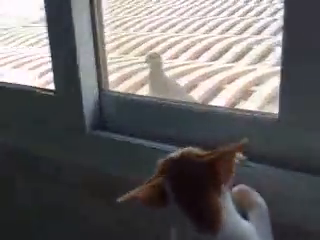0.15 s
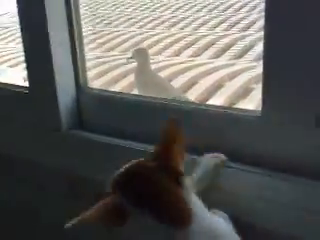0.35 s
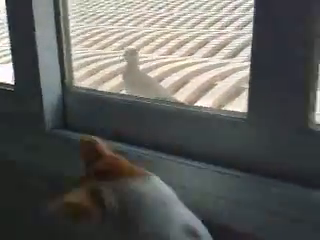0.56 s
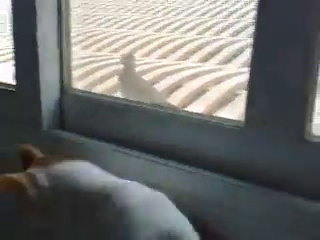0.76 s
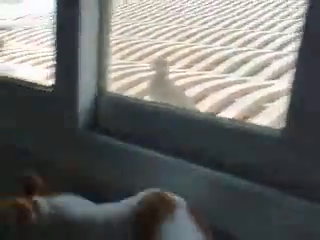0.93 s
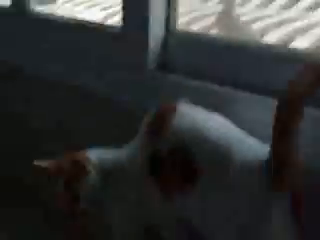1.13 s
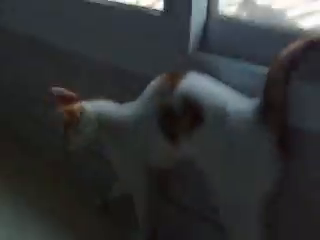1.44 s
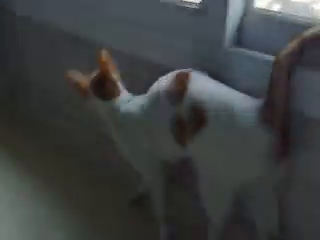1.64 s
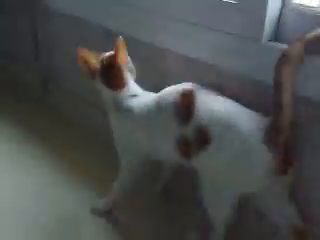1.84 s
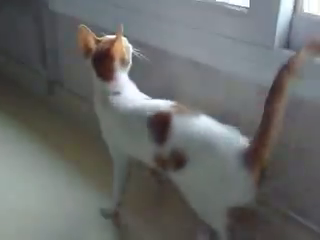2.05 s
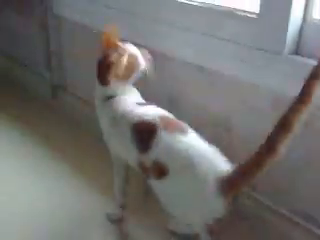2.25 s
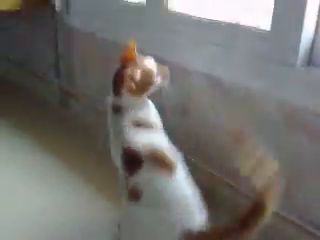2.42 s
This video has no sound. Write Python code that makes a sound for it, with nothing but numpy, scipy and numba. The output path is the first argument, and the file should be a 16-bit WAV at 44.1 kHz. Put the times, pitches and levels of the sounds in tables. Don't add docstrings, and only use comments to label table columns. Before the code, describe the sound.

A cat meows once, short and high, in a bare echoing room over a low motor hum.

```python
import sys
import numpy as np
from scipy import signal
from scipy.io import wavfile
from scipy.ndimage import uniform_filter1d
from numba import njit

SR = 44100
rng = np.random.default_rng(int(sys.argv[2]) if len(sys.argv) > 2 else 0)


def generate_wav(sig):
    pcm = np.round(np.clip(np.atleast_2d(sig).T, -1, 1) * 32767).astype(np.int16)
    wavfile.write(sys.argv[1], SR, pcm)


def gain_from_decibels(decibels):
    exponent = np.asarray(decibels, float) / 20
    return 10 ** exponent


N = 113778


def level(x, db):
    return x * gain_from_decibels(db) / np.sqrt(np.mean(x ** 2))


def colour(table, hz):
    table = np.array(table, float)
    return np.interp(np.log(hz + 1), np.log(table[:, 0]), table[:, 1])


def band(x, hz, width_hz):
    edges_hz = [max(hz - width_hz / 2, 10), hz + width_hz / 2]
    return signal.sosfilt(signal.butter(2, edges_hz, "band", fs=SR, output="sos"), x)


def noise_band(hz, width_hz):
    return band(rng.standard_normal(N), hz, width_hz)


def walk(rate_hz):
    k = int(SR / rate_hz)
    held = np.repeat(rng.standard_normal(N // k + 1), k)
    return 1.96 * uniform_filter1d(uniform_filter1d(held, k), k)[:N]


def turbulence(table, db, low_hz, count, flicker_db):
    out, swell_db = 0, 0.25 * walk(1.5)
    for hz in low_hz * 2 ** (np.arange(count) / 3):
        gain = gain_from_decibels(colour(table, hz) + swell_db + flicker_db * walk(7.84))
        out = out + gain * noise_band(hz, hz / 4)
    return level(out, db)


# frequency in Hz, density in dB per Hz.
RUMBLE = [(12, -15), (70, -1), (130, -4), (250, -10), (400, -12), (650, -16), (950, -18.5), (1900, -32)]


def rumble():
    return turbulence(RUMBLE, -50, low_hz=12.8, count=23, flicker_db=1.0)


# frequency in Hz, density in dB per Hz.
WHINE_NOISE = [(1900, -16.5), (2150, 4), (2800, -3.5), (3300, -8.5), (4200, -7), (5000, -8), (6200, -14.5),
               (7500, -14.5)]


def whine():
    fade_db = -0.5 * (np.arange(N) / SR - 1.5)
    return gain_from_decibels(fade_db) * turbulence(WHINE_NOISE, -67, low_hz=1990, count=7, flicker_db=0.8)


# multiple of the shaft rate, level in dB, wobble in dB.
HUM_LINES = [(2, -51.5, 0), (4, -52, 1.5), (6, -61, 1.5), (7, -59, 2), (10, -59, 1.5), (12, -51.5, 0.5),
             (14, -55.5, 1.5), (16, -61, .5)]
# multiple of the shaft rate, level in dB.
HIGH_LINES = [(72, -71), (74, -75.5), (96, -76.5)]


def motor():
    shaft_hz = 29.347 * (1 + 0.00035 * walk(4.8))
    phase = 2 * np.pi * np.cumsum(shaft_hz) / SR
    fade_db = -3.0 * (np.arange(N) / SR - 1.3)
    out = 0
    for k, db, wobble_db in [*HUM_LINES, *((k, db + fade_db, 1) for k, db in HIGH_LINES)]:
        gain = np.sqrt(2) * gain_from_decibels(db + wobble_db * walk(14))
        out = out + gain * np.sin(k * phase + 2 * np.pi * rng.random())
    return out


# start in seconds, level in dB, pitch in Hz, T60 in seconds.
STRAP_TICKS = [(.007, -41, 3580, 0.03), (.008, -49.5, 5650, 0.045), (0.01, -40.5, 1260, 0.026),
               (1.257, -53.5, 2090, 0.12), (1.496, -67, 2540, 0.063), (1.781, -77, 2480, 0.015),
               (1.875, -56, 2540, 0.1), (1.898, -52, 2330, 0.14), (1.929, -53, 2300, 0.14),
               (1.956, -63, 2320, 0.079), (1.968, -54, 2200, 0.1), (1.989, -55.5, 2210, 0.11),
               (2.02, -58.5, 2320, 0.13), (2.127, -63, 2560, 0.012)]


def strap_ticks():
    t, rise_s, out = np.arange(N) / SR, 0.004, 0
    for start_s, db, hz, t60_s in STRAP_TICKS:
        rise = np.clip((t - start_s) / rise_s, 0, 1)
        decay = gain_from_decibels(-60 * np.clip(t - start_s, 0, None) / t60_s)
        out = out + rise * decay * level(band(noise_band(hz, 0.39 * hz), hz, 0.83 * hz), db)
    return out


def strap_rustle():
    peak_s, rise_s, fall_s = 1.89, 0.03, 0.16
    after_s = np.arange(N) / SR - peak_s
    shape = np.where(after_s < 0, np.exp(-(after_s / rise_s) ** 2), np.exp(-np.abs(after_s) / fall_s))
    return shape * gain_from_decibels(4.2 * walk(70)) * level(noise_band(2600, 2800), -64)


@njit
def walls(x, lags, gain, damp):
    line, soft, out = np.zeros((8, 8192)), np.zeros(8), np.zeros(len(x))
    for i in range(len(x)):
        total = 0.
        for k in range(8):
            soft[k] += (1 - damp) * (gain[k] * line[k, (i - lags[k]) & 8191] - soft[k])
            total += soft[k]
            out[i] += soft[k] * (1 - 2 * (k % 2))
        for k in range(8):
            line[k, i & 8191] = x[i] + soft[k] - total / 4
    return out


def tiled_room(cat):
    t60_s, bass_hz, bass_db = 0.67, 1100, -7
    lags = np.array([331, 487, 683, 877, 1069, 1319, 1567, 1871])
    send = cat - (1 - gain_from_decibels(bass_db)) * band(cat, bass_hz / 2, bass_hz)
    return gain_from_decibels(-14) * walls(send + 1e-18, lags, gain_from_decibels(-60 * lags / SR / t60_s), 0.075)


# frequency in Hz, width in Hz, level in dB.
ROOM_MODES = [(2524, 2.4, -5)]


def room_mode_ring(cat):
    out = 0
    for hz, width_hz, db in ROOM_MODES:
        out = out + gain_from_decibels(db) * signal.lfilter(*signal.iirpeak(hz, hz / width_hz, SR), cat)
    return out


def resonance(hz, centre_hz, width_hz):
    return 1 / np.sqrt(1 + (2 * (hz - centre_hz) / width_hz) ** 2)


def snarl_db(t, k):
    peak_s, half_s, depth_db = 0.805 + 0.03 * max(k - 7, 0), 0.07, 12
    return depth_db * np.exp(-((t - peak_s) / half_s) ** 4) - depth_db / 2


def lip_puff(t, part_s):
    noise = band(band(noise_band(4300, 3600), 4300, 3600), 4300, 4400)
    return (t > part_s) * np.exp(-((t - part_s) / 0.16) ** 4) * level(noise, -62)


# frequency in Hz, gain in dB.
THROAT_COLOUR = [(1380, -12), (1600, -1), (2600, 0), (3300, -11), (4150, -5), (5000, 4), (5800, -9),
                 (7500, -10)]
# frequency in Hz, gain in dB.
TILE_WAVES = [(600, 2), (650, 1), (690, 0), (735, -3), (785, 7), (828, 0.5)]


def voice(table, hold_s):
    t, rows = np.arange(N) / SR, np.array(table, float)
    glides = [uniform_filter1d(np.interp(t, rows[:, 0], rows[:, k]), int(0.03 * SR)) for k in range(1, 7)]
    hz, low_db, high_db, jaw_hz, tongue_hz, edge_db = glides
    jaw_width_hz, tongue_width_hz, tongue_db, shimmer_db = 237, 1070, -0.2, 2.82

    lips_part_s, lips_close_s, lips_shut_db = 0.574, 1.014, -16
    shut = np.maximum((lips_part_s - t) / 0.012, (t - lips_close_s) / 0.049)
    high_db = high_db + lips_shut_db * np.clip(shut, 0, 1)

    phase = 2 * np.pi * np.cumsum(hz * (1 + 0.0012 * walk(59.65))) / SR
    out = gain_from_decibels(low_db + colour(TILE_WAVES, hz) + shimmer_db * walk(39.72)) * np.sin(phase)
    breath = 1 + gain_from_decibels(-24) * walk(500)
    for k in range(2, 10):
        f = k * hz
        jaw = resonance(f, jaw_hz, jaw_width_hz)
        tongue = gain_from_decibels(tongue_db) * resonance(f, tongue_hz, tongue_width_hz)
        db = high_db + colour(THROAT_COLOUR, f) + shimmer_db * walk(50.06)
        db = db + edge_db * np.clip((f - tongue_hz) / tongue_width_hz, 0, 1)
        if k > 5:
            db = db + snarl_db(t, k)
        out = out + (jaw + tongue) * gain_from_decibels(db) * np.sin(k * phase + k * k)

    hiss = gain_from_decibels(high_db - 23) * level(noise_band(1700, 2500), 0)
    out = out + hiss + lip_puff(t, lips_part_s)
    attack = np.clip((t - rows[0, 0]) / 0.015, 0, 1)
    release = np.clip((rows[-1, 0] + hold_s - t) / 0.024 + 1, 0, 1)
    return np.sqrt(2) * out * breath * attack * release


# time in seconds, pitch in Hz, fundamental in dB, overtones in dB,
# jaw resonance in Hz, tongue resonance in Hz, brightness above the tongue in dB.
MEOW_GLIDE = [
    (.516, 638.3, -34.5, -47, 900, 2047, 8.5),
    (.54, 673, -37, -45.5, 750, 1850, -27),
    (.605, 674, -40.5, -40, 710, 1910, -3.5),
    (.69, 791.2, -54.5, -47.5, 1656, 2135, -4),
    (.775, 826.5, -63, -42, 1650, 2430, -6),
    (.862, 825.7, -47, -37, 1340, 2480, -16.5),
    (.905, 773, -41.5, -45, 1220, 2220, -8),
    (.975, 687, -33, -43, 905, 1870, -20.5),
    (1.045, 595.7, -42.5, -39, 900, 1793, -6.5),
]
# time in seconds, pitch in Hz, fundamental in dB, overtones in dB,
# jaw resonance in Hz, tongue resonance in Hz, brightness above the tongue in dB.
CHIRP_GLIDE = [
    (.476, 645, -36, -47, 1250, 1300, -3),
    (.49, 643, -37.5, -42.5, 1250, 1310, -5.5),
    (.497, 599, -40.5, -34.5, 1250, 1320, -23.5),
]


def cat_call():
    return voice(MEOW_GLIDE, hold_s=0.015) + voice(CHIRP_GLIDE, hold_s=0.00097)


def scene():
    cat = cat_call()
    background = motor() + rumble() + whine() + strap_ticks() + strap_rustle()
    return (cat + tiled_room(cat) + room_mode_ring(cat) + background)[None]


# frequency in Hz, threshold in dB.
QUIET_LIMIT = [(1500, -100), (3000, -94.5), (5000, -99.5), (6500, -91), (7300, -88.5), (7600, -75),
               (9000, -77)]


def drop_faint_bands(x):
    size, hop, wide = 2048, 512, 8
    padded = np.pad(x, (0, size), "reflect")
    f, _, z = signal.stft(padded, SR, nperseg=size, noverlap=size - hop, boundary="even")
    count = len(f) // wide
    power = (np.abs(z[:count * wide]) ** 2).reshape(count, wide, -1).sum(axis=1)
    db = 10 * np.log10(power * 4 / 3 + 1e-20)
    hz = f[:count * wide].reshape(count, wide).mean(axis=1)

    fall_db = -32 * np.log2(hz)[:, None]
    hidden_db = np.maximum.accumulate(db - fall_db, axis=0) + fall_db - 19.5

    loud_db = 10 * np.log10(gain_from_decibels(2 * db[(hz > 500) & (hz < 3000)]).sum(axis=0))
    recent_db = uniform_filter1d(loud_db, 15, origin=7, mode="nearest")
    jump_db = np.clip(uniform_filter1d(loud_db, 3, origin=-1) - recent_db, 0, None)
    patch = np.repeat(rng.standard_normal((count, len(loud_db) // 8 + 1)), 8, axis=1)[:, :len(loud_db)]
    limit_db = colour(QUIET_LIMIT, hz)[:, None] + 1.25 * jump_db + 2.5 * patch

    heard = uniform_filter1d(db, 3, axis=1) > np.maximum(hidden_db, limit_db)
    keep = heard | (hz < 1200)[:, None]
    z[:count * wide] *= np.repeat(keep, wide, axis=0)
    return signal.istft(z, SR, nperseg=size, noverlap=size - hop)[1][:N]


def roll_off(x):
    return signal.sosfilt(signal.butter(12, 8810, fs=SR, output="sos"), x)


def record(dry):
    top_cut = signal.ellip(8, 0.2, 70, 8800, fs=SR, output="sos")
    mix = signal.sosfilt(top_cut, drop_faint_bands(dry[0])[None]) + 0.0003
    mix = mix * np.clip(np.arange(N)[::-1] / (0.003 * SR), 0, 1)
    return roll_off(mix)


dry = scene()
out = record(dry)
generate_wav(out)
```